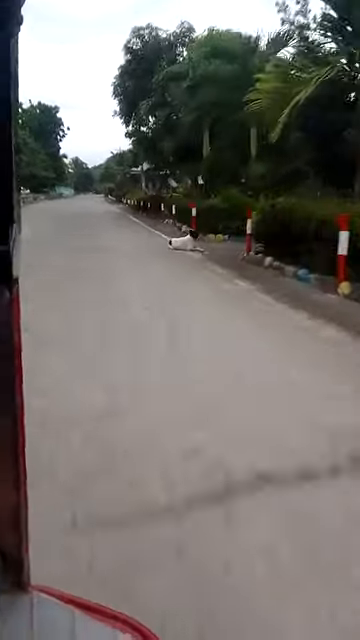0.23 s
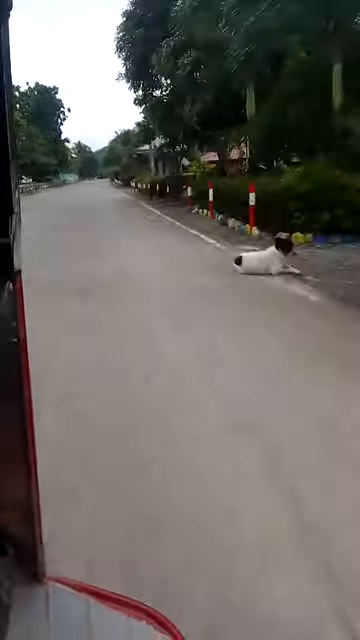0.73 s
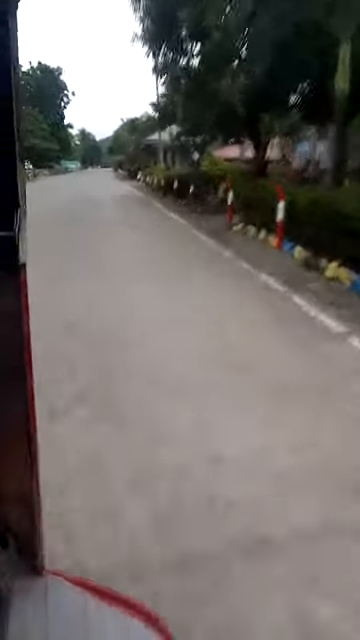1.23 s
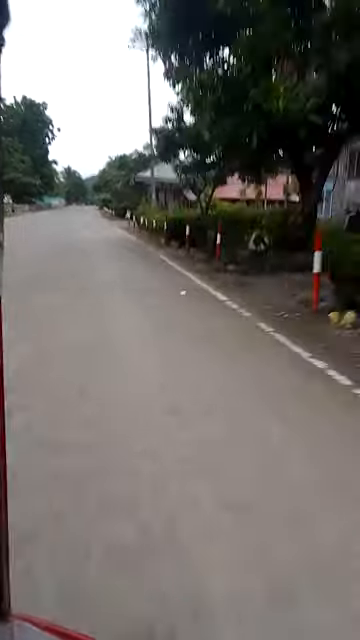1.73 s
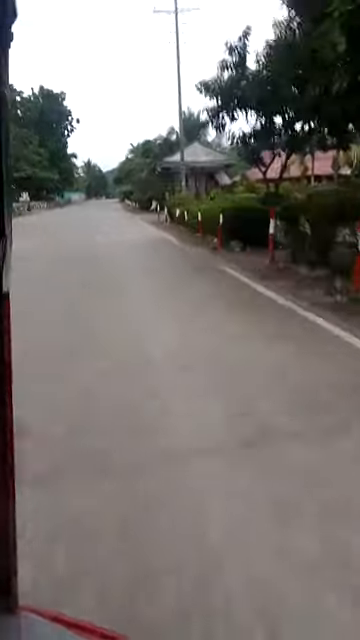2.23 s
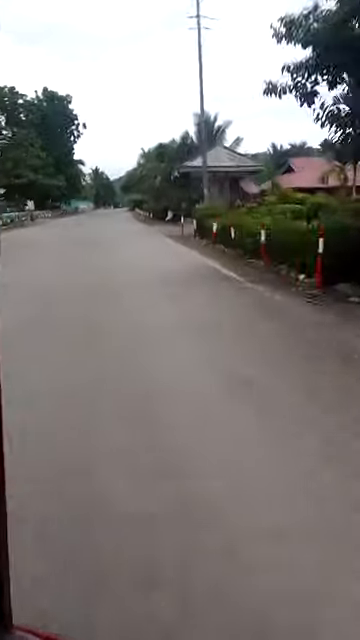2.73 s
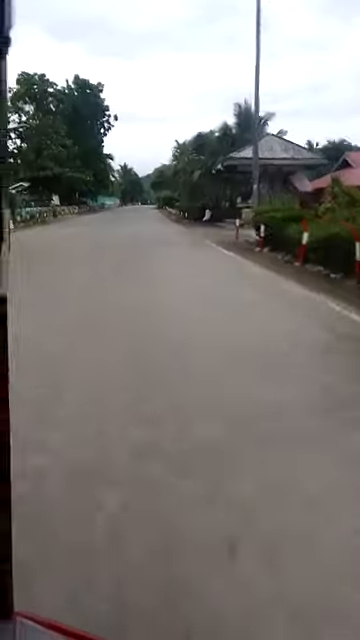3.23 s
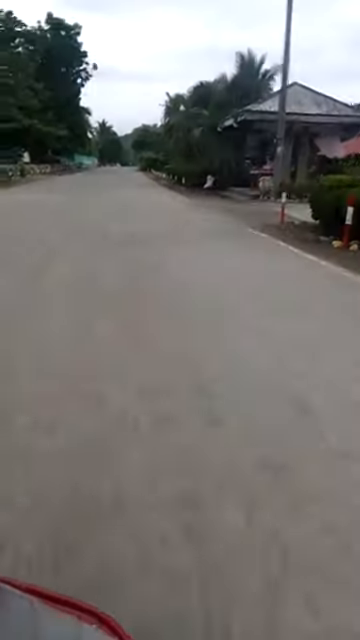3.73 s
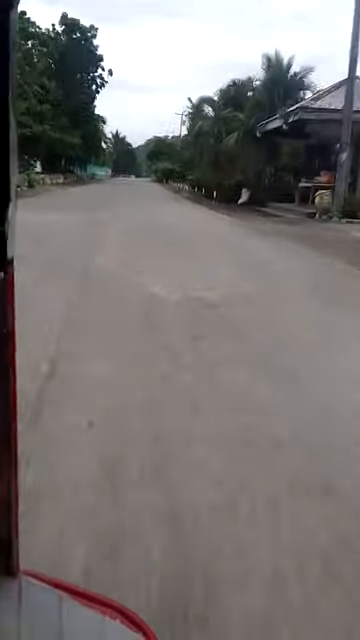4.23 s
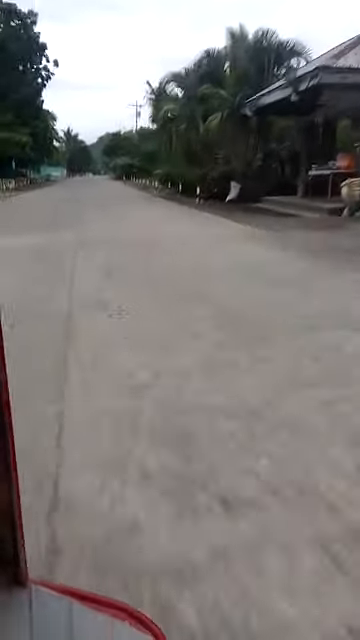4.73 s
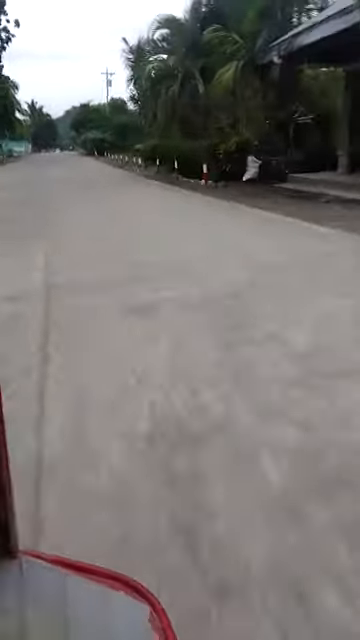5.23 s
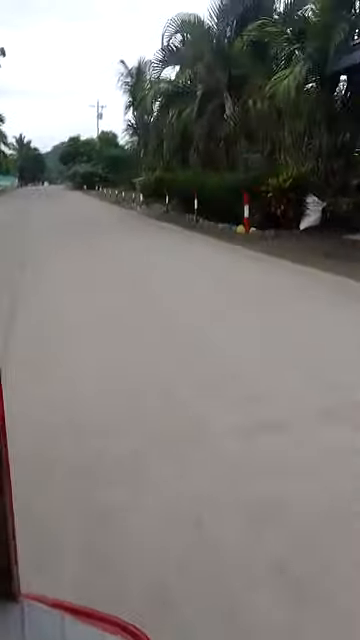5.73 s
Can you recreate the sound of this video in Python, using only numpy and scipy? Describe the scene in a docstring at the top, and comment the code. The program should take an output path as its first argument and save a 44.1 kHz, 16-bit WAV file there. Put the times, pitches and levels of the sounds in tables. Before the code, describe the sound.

Heard on board, a motorcycle and sidecar cruise along with a thudding engine, clinking loose parts, low rumble and wind.

```python
"""On a concrete road, heard from the seat, a motorcycle cruises along with an open sidecar.
Its one-cylinder four-stroke engine fires about 25 times a second, each puff thudding through the
silencer, while gears and chain whirr. Thud, whirr, rumble and hiss swell as the frame shakes.
Road joints thump the sidecar's cab, loose parts rattle, jingle and squeak,
and gusts of wind brush the microphone."""
import sys
import numpy as np
from scipy import signal
from scipy.fft import rfft, irfft, next_fast_len
from scipy.io import wavfile
from scipy.ndimage import uniform_filter1d

SR = 44100
rng = np.random.default_rng(int(sys.argv[2]) if len(sys.argv) > 2 else 0)


def output_pcm(signal):
    """Save a mono or channel-first signal as 16-bit PCM at the path in sys.argv[1].

    Samples are clipped to [-1, 1] before scaling.
    """
    pcm = np.clip(np.atleast_2d(signal).T, -1, 1) * 32767
    wavfile.write(sys.argv[1], SR, np.round(pcm).astype(np.int16))


N = 263718
TIME = np.arange(N) / SR

# How fast the engine runs: (time [s], firings [1/s])
ENGINE_SPEED = [(0, 24.55), (1, 24.66), (3, 24.7), (3.4, 24.78), (3.9, 25.1), (4.6, 25.22), (5, 25.4),
                (5.98, 25.3)]
# How hard the moving parts shake the frame: (time [s], level [dB])
FRAME_SHAKE = [(0.0, -27.5), (0.32, -34), (0.6, -31.5), (0.76, -34), (0.82, -29), (1.61, -32),
               (1.64, -35.5), (1.93, -33.5), (1.95, -35), (2.17, -25.5), (2.26, -27), (2.93, -29.5),
               (3.58, -35.5), (3.9, -24), (4.03, -25.5), (4.07, -29), (5.54, -30), (5.56, -30)]
# The tone of four steady noises, from low to high: (frequency [Hz], level [dB])
WIND_TONE = [(10, -12), (25, 12.5), (50, 13.5), (75, 11.5), (130, 7), (400, -44)]
HISS_TONE = [(1200, -2.5), (2800, 7.5), (4300, 6.5), (5700, 6), (6700, 1.5), (7500, 7.5), (8200, 4),
             (10200, -7.5), (14200, 1.5), (16000, 5)]
RUMBLE_TONE = [(25, -29), (60, -11.5), (80, -4.5), (91, 8), (104, -5.5), (160, -0.5), (200, -10), (230, -5),
               (275, -12), (350, -6.5), (440, -17), (500, -15.5), (700, -29), (1200, -45)]
WHIRR_TONE = [(200, -23), (450, -3.5), (600, 1), (760, -0.5), (1000, 2), (1350, 0), (1560, -7.5),
              (2100, -8.5), (2700, -8.5), (3300, -19), (6000, -32)]
# Gusts on the microphone: (time [s], level above the breeze [dB])
GUSTS = [(.09, 15), (2.46, 9), (2.72, 1), (2.92, 11), (3.74, 6), (4.1, 15.5), (5.45, 13)]
# Jolts from joints in the road: (time [s], strength [dB])
ROAD_JOINTS = [(0.047, -6), (0.124, -1), (0.221, -5.5), (0.243, -3), (0.256, 2.5), (0.286, -3),
               (1.393, -7.5), (2.118, -8), (2.166, -2.5), (3.878, -9), (3.928, -7), (4.339, -4.5),
               (4.944, -6), (4.999, -5), (5.351, -5), (5.609, -4.5), (5.705, -1.5)]
# The notes of the cab's panels: (pitch [Hz], level [dB], time to fade by 60 dB [s])
CAB_NOTES = [(60, -37, .07), (100.3, 2, 0.11), (162, -6.5, 0.096), (234, 0.5, 0.052), (475, -12, 0.027),
             (760, -15.5, .025)]
# Thin squeaks: (time [s], length [s], start pitch [Hz], end pitch [Hz], level [dB])
SQUEAKS = [(2.42, 0.056, 7850, 7780, -35), (2.622, 0.056, 7750, 7420, -31.5),
           (2.662, 0.051, 8600, 8300, -37), (2.754, 0.068, 7870, 6960, -32.5)]
# Landings of a small steel part: (time [s], strength [dB])
JINGLES = [(0.5687, -33), (0.6244, -36), (0.6495, -35.5), (0.9043, -29.5), (0.9772, -37), (1.161, -33),
           (1.2092, -38), (1.3548, -32), (1.3996, -32), (1.4446, -29), (1.5334, -35), (1.5644, -35),
           (2.0058, -37), (2.0427, -31.5), (2.234, -32.5), (2.511, -31), (2.7294, -33), (3.1224, -36),
           (3.243, -27), (3.6634, -31), (4.5644, -31), (5.4271, -30)]
# Knocks of a loose panel: (time [s], strength [dB], brightness or extra clink over clack [dB])
KNOCKS = [(0.442, -29, 4), (0.84, -30, 2), (0.8978, -29.5, 11), (1.327, -28, 5), (1.491, -28, 3),
          (1.543, -29.5, 6), (1.724, -30.5, 4), (1.7707, -28.5, -4), (1.8756, -27.5, -0.5),
          (1.922, -30.5, -1), (2.361, -26, 0), (2.508, -29, 10), (2.587, -29, 0), (2.7023, -30.5, 9),
          (3.09, -31.5, 5), (3.1228, -23.5, 6.5), (3.775, -26, -2), (3.866, -26, 6), (4.161, -28.5, 12),
          (4.4215, -29.5, -1), (5.01, -27, -3), (5.163, -28, 6), (5.198, -29, 4), (5.3897, -29.5, -4.5),
          (5.596, -27, 1), (5.639, -30, -3.5), (5.7897, -30, 2), (5.823, -26, 3.5)]
# The notes at which each part rings: (pitch [Hz], width [Hz], level [dB])
STEEL_NOTES = [(5680, 450, -6.5), (7976, 120, -1), (10340, 91, -7.5), (12000, 130, -8), (12700, 160, -7),
               (14700, 160, -6)]  # the small steel part
CLACK_NOTES = [(1160, 290, 17.5), (2100, 170, 1), (2160, 150, 10), (2500, 52, 8)]  # a loose panel
CLINK_NOTES = [(3680, 900, -31.5), (4700, 320, -47.5), (6070, 430, 20), (7370, 2000, 21.5),
               (8100, 440, -4.5), (13700, 2200, 13)]  # its fittings
HOLLOW_NOTES = [(1440, 130, 4), (1578, 37, 9), (1680, 110, -27)]  # the side panel
CASING_NOTES = [(600, 50, -10), (980, 80, -9), (1125, 80, -2), (1250, 80, -1), (1345, 70, -8),
                (1590, 40, -15), (1770, 50, -4), (1850, 70, -8), (2540, 100, -16), (3560, 100, -20),
                (5370, 140, -24)]  # gear case and chain guard
SILENCER_NOTES = [(99, 22, -6.5), (125.8, 6, -3), (143, 106, -2.5), (199.8, 15, 2), (375.3, 13.3, -1),
                  (453, 42, -7)]
# How the microphone's opening weakens the treble: (frequency [Hz], level [dB])
MIC_OPENING = [(8300, -0.5), (8900, -8), (10000, -11), (11500, -9.5), (14000, -5.5), (16000, -12)]

# How each layer follows the ride:
# (base level [dB], change per dB of shake [dB], change per extra firing a second [dB])
WIND_SWELL, HISS_SWELL, RUMBLE_SWELL = (-30, 0.78, 0), (-41.5, 0.84, 0), (-23, 0.95, -1.5)
WHIRR_SWELL, EXHAUST_SWELL = (-29, 0.9, 0), (-24, 0.86, 3.3)


def from_db(db):
    """Turn decibels into a number to multiply by."""
    return 10 ** (np.asarray(db) / 20)


def unit_level(x):
    """Scale a sound to an average power of 1."""
    return x / np.sqrt(np.mean(x ** 2) + 1e-20)


def steady(x, window_s):
    """Hold a noise at an even level over short stretches of time."""
    return x / np.sqrt(uniform_filter1d(x * x, int(window_s * SR)) + 1e-9)


def drift(rate_hz):
    """A smooth random wander, about 1 in size; a higher rate wanders faster."""
    step, warm_up = 40, 2000
    r = np.exp(-2 * np.pi * step * rate_hz / SR)
    slow = signal.lfilter([1], [1, -2 * r, r * r], rng.standard_normal(N // step + warm_up + 2))
    slow = unit_level(slow[warm_up:])
    return np.interp(np.arange(N) / step, np.arange(len(slow)), slow)


def colour(x, tone):
    """Turn each frequency up or down as a tone table says."""
    hz, db = np.transpose(tone)
    size = next_fast_len(N + SR // 10)
    bins = np.maximum(np.fft.rfftfreq(size, 1 / SR), 1)
    gain = from_db(np.interp(np.log(bins), np.log(hz), db))
    return irfft(rfft(x, size) * gain, size)[:N]


def noise(tone):
    """Steady noise with the given tone."""
    return unit_level(colour(rng.standard_normal(N), tone))


def band(x, low_hz, high_hz):
    """Let through mainly what lies between two frequencies."""
    return signal.sosfilt(signal.butter(2, [low_hz, high_hz], "band", fs=SR, output="sos"), x)


def resonate(forces, notes):
    """Make a part ring at its notes, pushed by one shared force or by one force per note."""
    sound, power = 0, 0
    for force, (hz, width, db) in zip(np.broadcast_to(forces, (len(notes), N)), notes):
        r = np.exp(-np.pi * width / SR)
        gain = from_db(db) * (1 - r * r) / 2
        feedback = [1, -2 * r * np.cos(2 * np.pi * hz / SR), r * r]
        sound = sound + signal.lfilter([gain, 0, -gain], feedback, force + 1e-18)
        power += gain * from_db(db)
    return sound / np.sqrt(power)


def clicks(times, db):
    """Silence with one click at each time."""
    sound = np.zeros(N)
    sound[np.clip(np.round(np.asarray(times) * SR).astype(int), 0, N - 1)] = from_db(db)
    return sound


def buzz(hits, fade_s):
    """Turn each click into a burst of noise that fades by 60 dB in fade_s."""
    loudness = signal.lfilter([1], [1, -from_db(-60 / (fade_s * SR))], hits + 1e-18)
    return loudness * rng.standard_normal(N)


def chatter(times, db, fade_s, bounce_s, bounce_db):
    """The force of a loose part that lands, buzzes and bounces once within bounce_s."""
    again = times + bounce_s * rng.uniform(0.3, 0.93, len(times))
    return buzz(clicks(times, db) + clicks(again, db + bounce_db), fade_s)


def wind(gust_half_s, breeze_swing_db):
    """Air buffets the microphone: a restless breeze with short gusts."""
    gusts = sum(from_db(db) * np.exp(-((TIME - at) / gust_half_s) ** 2) for at, db in GUSTS)
    breeze = from_db(breeze_swing_db * drift(8.4))
    return np.hypot(breeze, gusts) * steady(noise(WIND_TONE), window_s=0.09)


def hiss(waver_db):
    """A high hiss whose level wavers gently."""
    return from_db(waver_db * drift(3.3)) * noise(HISS_TONE)


def ticking(per_s, spread_db, clack_db):
    """Shaking keeps the panels and fittings ticking faintly at random."""
    times = TIME[rng.random(N) < per_s / SR]
    force = buzz(clicks(times, spread_db * rng.uniform(-1, 1, len(times))), fade_s=0.036)
    return unit_level(resonate(force, CLINK_NOTES) + from_db(clack_db) * resonate(force, CLACK_NOTES))


def squeaks(waver):
    """Loose fittings give short, falling squeaks with an unsteady pitch."""
    sound, wobble = 0, 1 + waver * drift(120)
    for start, length, start_hz, end_hz, db in SQUEAKS:
        progress = np.clip((TIME - start) / length, 0, 1)
        hz = (start_hz + (end_hz - start_hz) * progress) * wobble
        loudness = from_db(db) * np.sin(np.pi * progress) ** 2
        sound = sound + loudness * np.sin(2 * np.pi * np.cumsum(hz) / SR)
    return sound


def jingles(level_db, vary_db):
    """A small steel part lands differently each time, bringing out different notes."""
    times, db = np.transpose(JINGLES)
    forces = []
    for _ in STEEL_NOTES:
        note_db = db + level_db + vary_db * rng.standard_normal(len(times))
        forces.append(chatter(times, note_db, fade_s=0.058, bounce_s=0.013, bounce_db=-3.5))
    return resonate(forces, STEEL_NOTES)


def rattles(clink_db, clack_db, hollow_db):
    """Loose panels knock: bright knocks mostly clink the fittings, dull ones clack and ring hollow."""
    times, db, bright_db = np.transpose(KNOCKS)
    clink = chatter(times, db + bright_db / 2 + clink_db, fade_s=0.079, bounce_s=0.0071, bounce_db=-21)
    clack = chatter(times, db - bright_db / 2 + clack_db, fade_s=0.057, bounce_s=0.0091, bounce_db=-9.5)
    ring = chatter(times, db - 0.84 * bright_db + hollow_db, fade_s=0.048, bounce_s=0.01, bounce_db=-12)
    return resonate(clink, CLINK_NOTES) + resonate(clack, CLACK_NOTES) + resonate(ring, HOLLOW_NOTES)


def road_thumps(vary_db):
    """Each road joint jolts the cab, ringing every panel note with a strength of its own."""
    times, db = np.transpose(ROAD_JOINTS)
    sound = 0
    for k, (hz, note_db, fade_s) in enumerate(CAB_NOTES):
        hit_db = db + note_db + vary_db * rng.standard_normal(len(times))
        force = (-1) ** k * clicks(times, hit_db)  # neighbouring notes swing opposite ways
        r, angle = from_db(-60 / (fade_s * SR)), 2 * np.pi * hz / SR
        feedback = [1, -2 * r * np.cos(angle), r * r]
        sound = sound + signal.lfilter([0, np.sin(angle)], feedback, force + 1e-18)
    return sound


def cab_rumble():
    """The shaking cab booms with a low, even noise."""
    return steady(noise(RUMBLE_TONE), window_s=0.1)


def gear_whirr(cycles, whirr_db, pulse_db, flutter_db):
    """Gears, valves and chain whirr and make their casing ring, pulsing in step with the engine."""
    # 1, 2 and 4 pulses per firing: the whole cycle, the crank's turns and the piston's strokes
    pulse = sum(np.cos(2 * np.pi * 2 ** k * cycles) / np.sqrt(k + 1) for k in range(3)) / 1.5
    # each note is shaken by the clatter near its own pitch
    clatter = [band(rng.standard_normal(N), hz / 1.4, hz * 1.4) for hz, _, _ in CASING_NOTES]
    whirr = resonate(clatter, CASING_NOTES) + from_db(whirr_db) * noise(WHIRR_TONE)
    return whirr * from_db(pulse_db * pulse + flutter_db * drift(33))


def exhaust(cycles, uneven_db, weak_share, weak_db, echo_s, echo_gain):
    """Each firing sends a soft puff through the silencer, with one echo along the pipe."""
    times = TIME[1:][np.diff(np.floor(cycles)) > 0]
    db = uneven_db * rng.standard_normal(len(times))
    db += weak_db * (rng.random(len(times)) < weak_share)  # on a light throttle some barely burn
    puffs = clicks(times, db) + echo_gain * clicks(times + echo_s, db)
    return unit_level(resonate(band(puffs, low_hz=82, high_hz=302), SILENCER_NOTES))


def swell(settings, shake_db, extra_firings):
    """How loud a layer is as the shake and the engine speed move around their averages."""
    base_db, per_shake, per_firing = settings
    return from_db(base_db + per_shake * shake_db + per_firing * extra_firings)


def scene():
    """Mix everything at one microphone; as the engine speeds up, it thuds more and the cab booms less."""
    speed = np.interp(TIME, *np.transpose(ENGINE_SPEED))
    shake_db = np.interp(TIME, *np.transpose(FRAME_SHAKE))
    ride = shake_db - shake_db.mean(), speed - speed.mean()
    cycles = np.cumsum(speed) / SR - 0.015 * speed[0]  # counts firings, the first at 0.015 s
    thuds = exhaust(cycles, uneven_db=1, weak_share=0.11, weak_db=-11, echo_s=0.0082, echo_gain=0.36)
    whirr = gear_whirr(cycles, whirr_db=-4.5, pulse_db=0.5, flutter_db=0.81)
    engine = swell(EXHAUST_SWELL, *ride) * thuds + swell(WHIRR_SWELL, *ride) * whirr
    cab = swell(RUMBLE_SWELL, *ride) * cab_rumble() + from_db(-7) * road_thumps(vary_db=2)
    loose_parts = rattles(clink_db=-8, clack_db=3, hollow_db=1.5)
    loose_parts += jingles(level_db=-1, vary_db=2) + squeaks(waver=0.022)
    ticks = from_db(-1.5) * ticking(per_s=50, spread_db=11, clack_db=11)
    background = swell(HISS_SWELL, *ride) * (ticks + hiss(waver_db=1.35))
    background += swell(WIND_SWELL, *ride) * wind(gust_half_s=0.027, breeze_swing_db=2)
    return (background + loose_parts + cab + engine)[None]


def record(dry):
    """The microphone's opening weakens the treble, and everything above 15750 Hz is cut steeply."""
    heard = colour(dry[0], MIC_OPENING)[None]
    return signal.sosfilt(signal.ellip(12, 0.2, 90, 15750, fs=SR, output="sos"), heard)


dry = scene()
out = record(dry)
output_pcm(out)
```